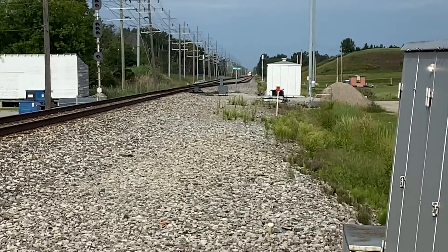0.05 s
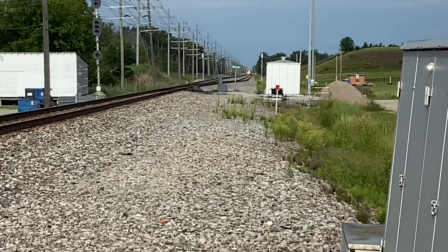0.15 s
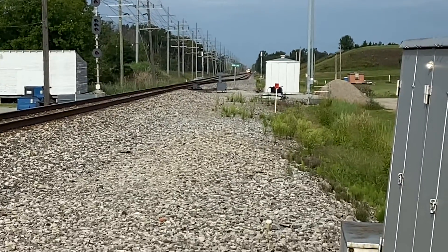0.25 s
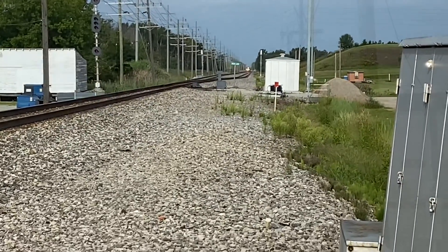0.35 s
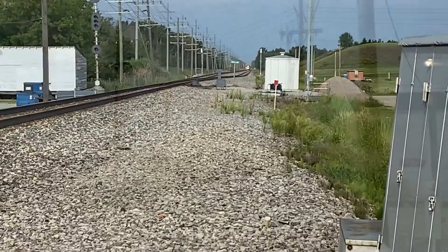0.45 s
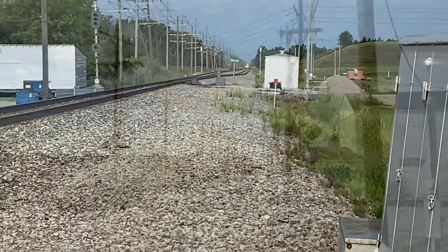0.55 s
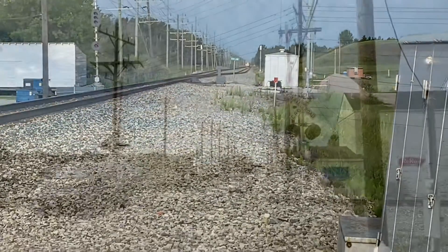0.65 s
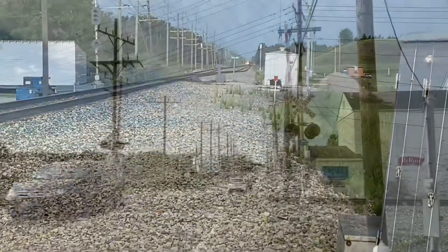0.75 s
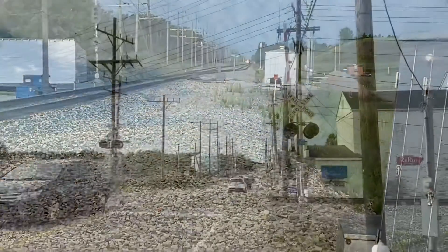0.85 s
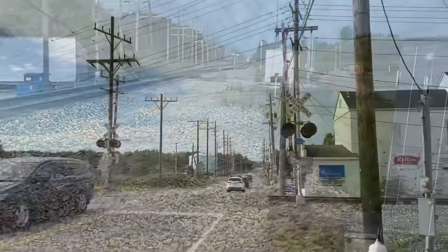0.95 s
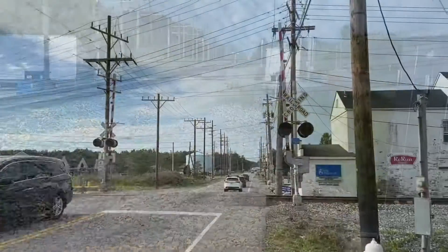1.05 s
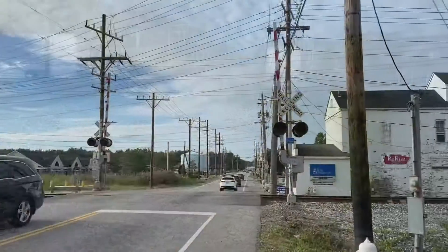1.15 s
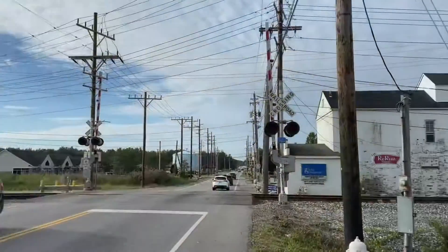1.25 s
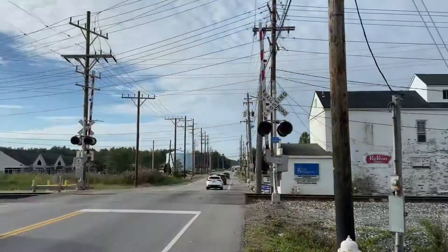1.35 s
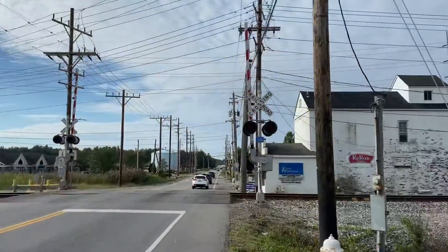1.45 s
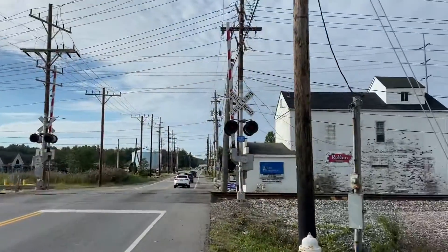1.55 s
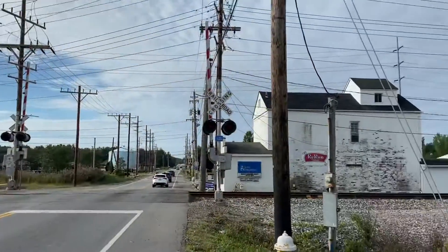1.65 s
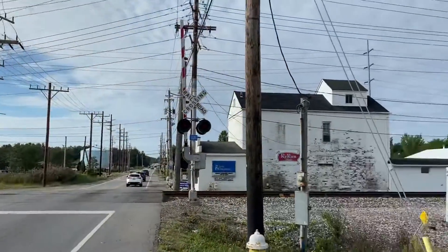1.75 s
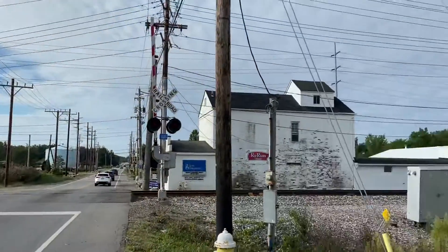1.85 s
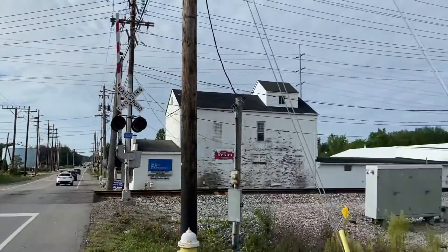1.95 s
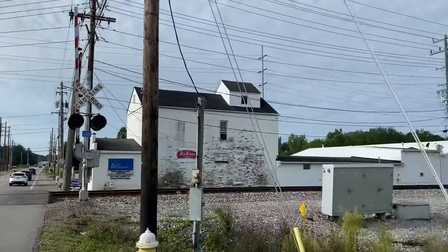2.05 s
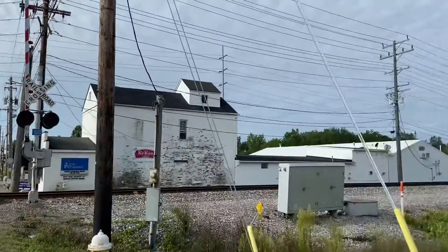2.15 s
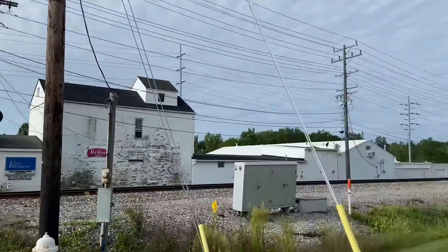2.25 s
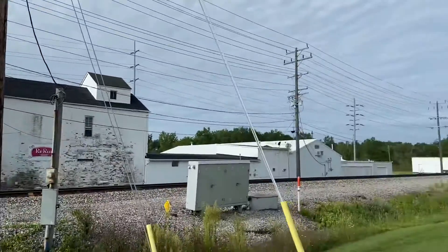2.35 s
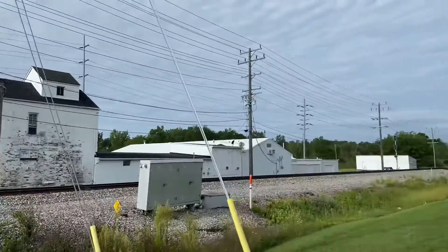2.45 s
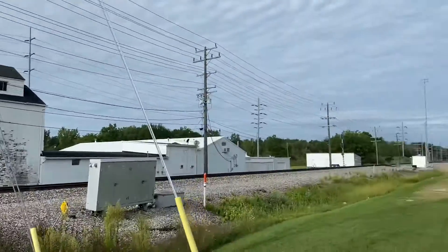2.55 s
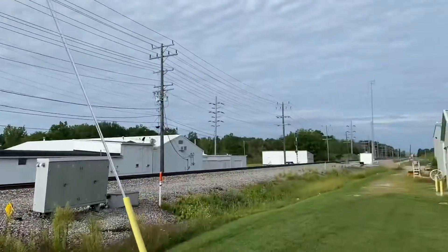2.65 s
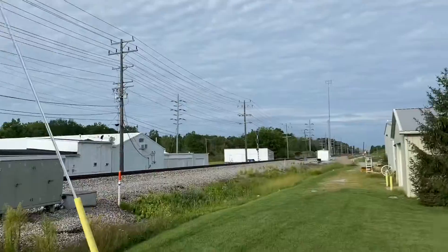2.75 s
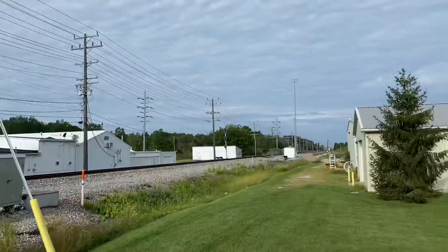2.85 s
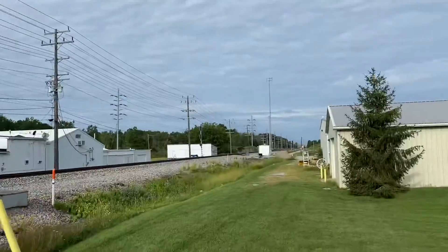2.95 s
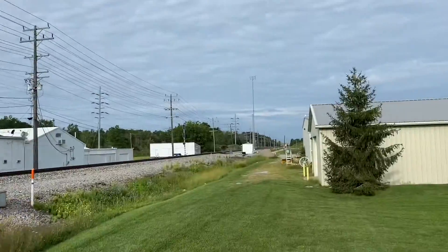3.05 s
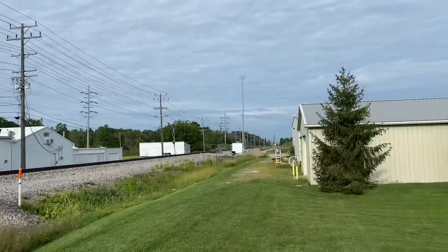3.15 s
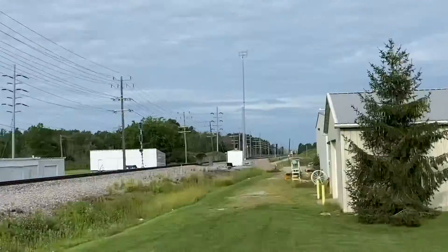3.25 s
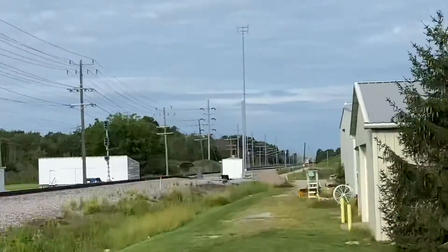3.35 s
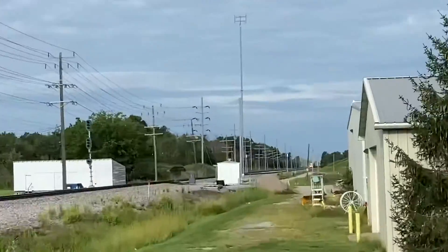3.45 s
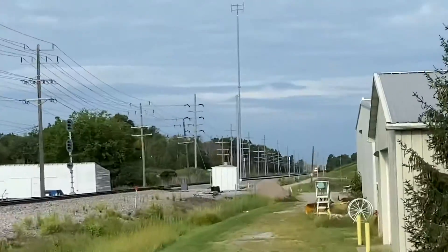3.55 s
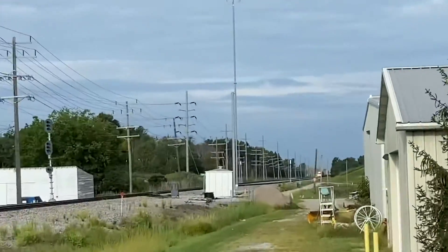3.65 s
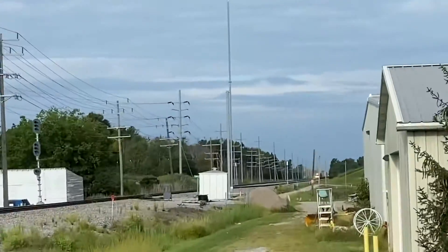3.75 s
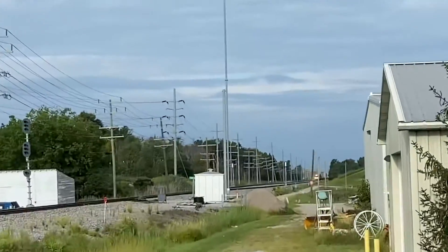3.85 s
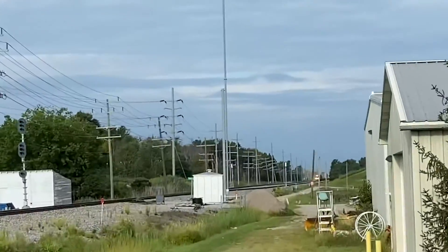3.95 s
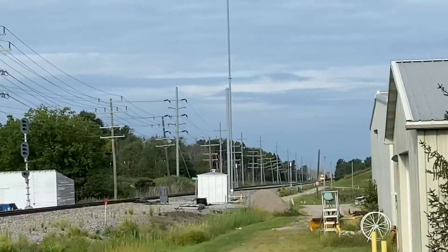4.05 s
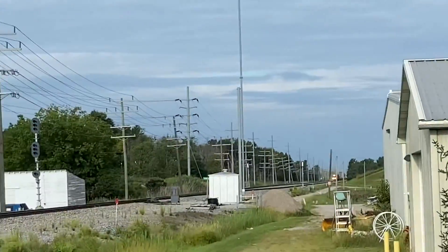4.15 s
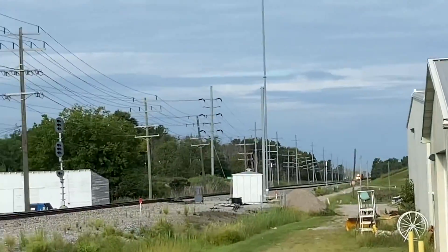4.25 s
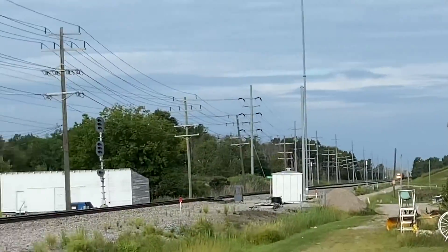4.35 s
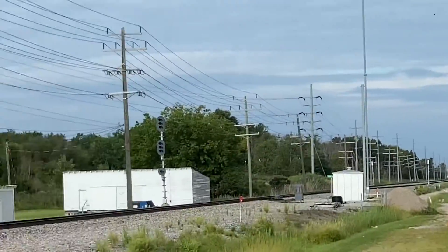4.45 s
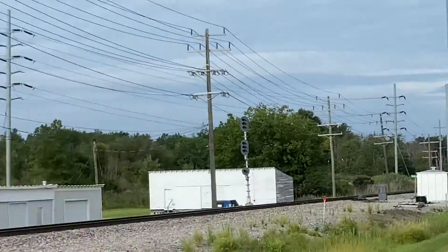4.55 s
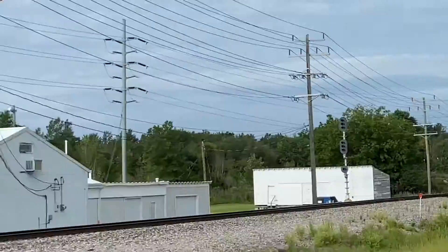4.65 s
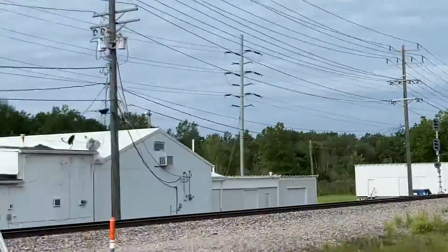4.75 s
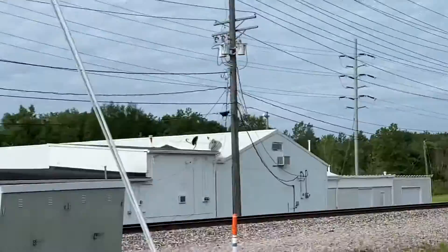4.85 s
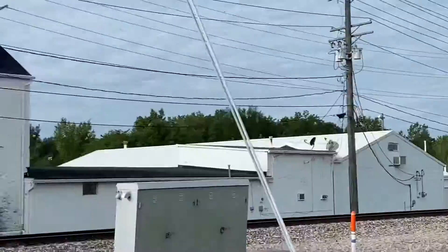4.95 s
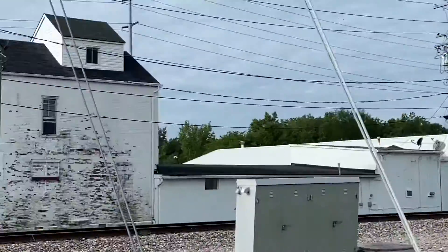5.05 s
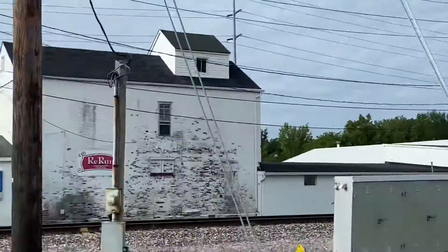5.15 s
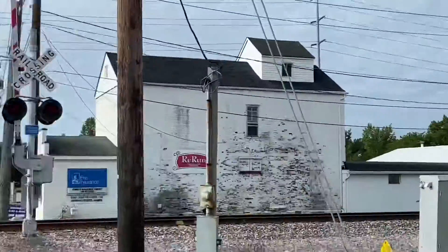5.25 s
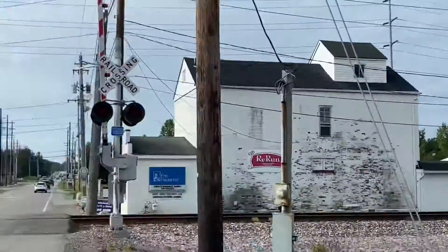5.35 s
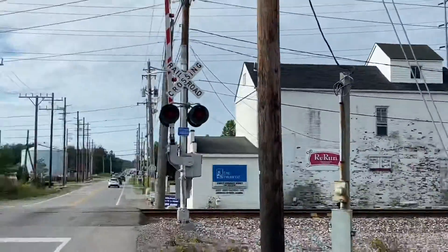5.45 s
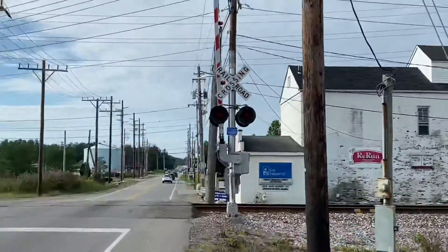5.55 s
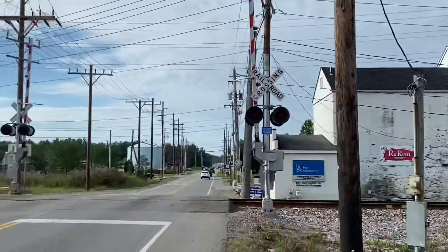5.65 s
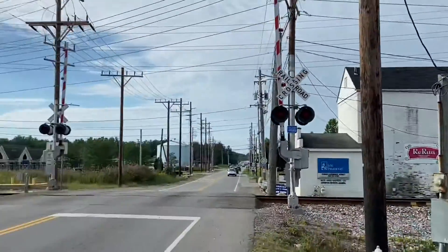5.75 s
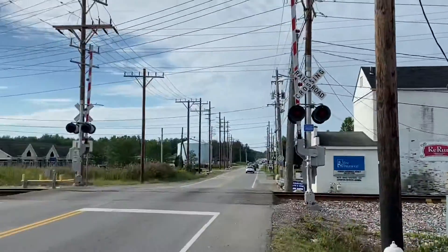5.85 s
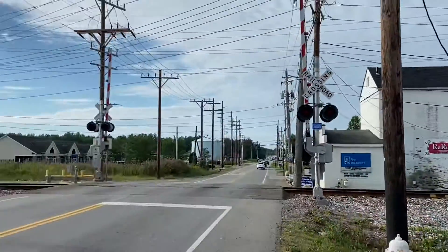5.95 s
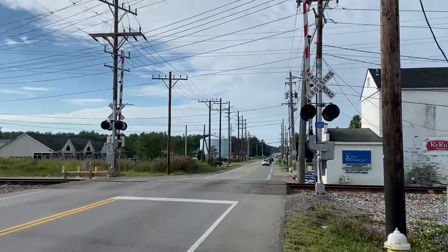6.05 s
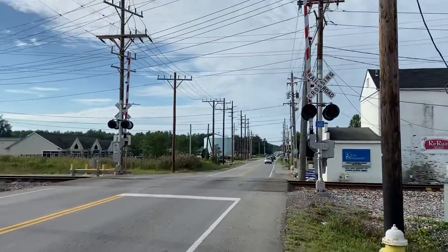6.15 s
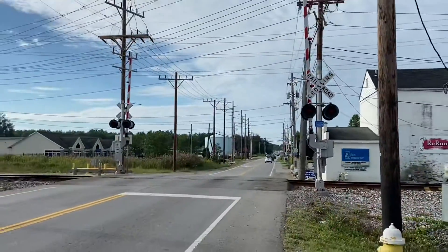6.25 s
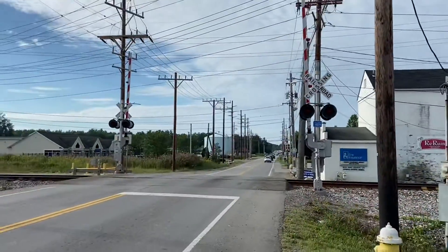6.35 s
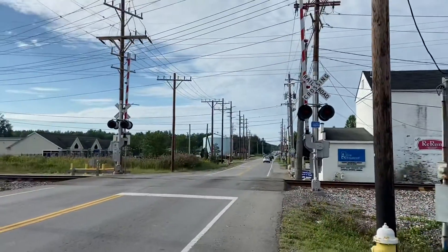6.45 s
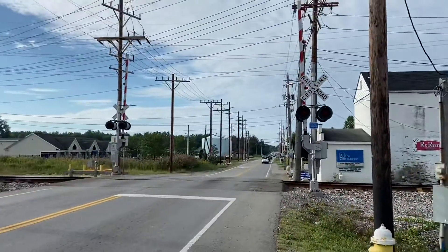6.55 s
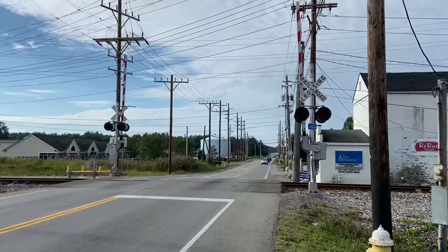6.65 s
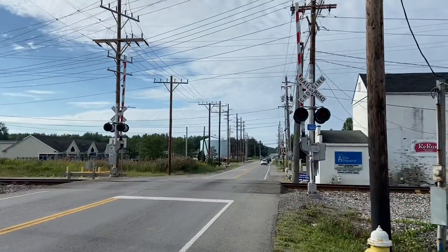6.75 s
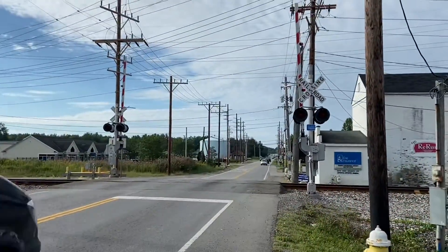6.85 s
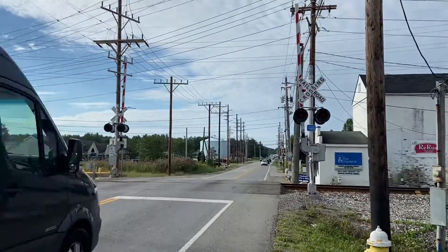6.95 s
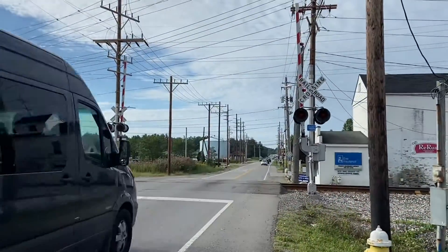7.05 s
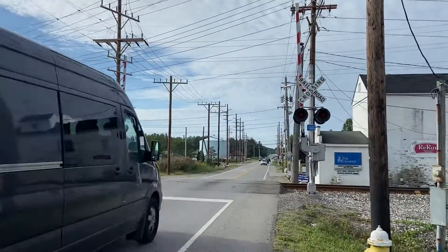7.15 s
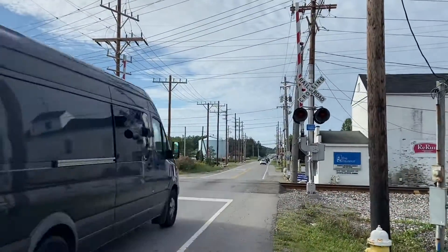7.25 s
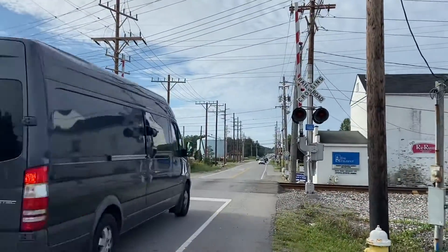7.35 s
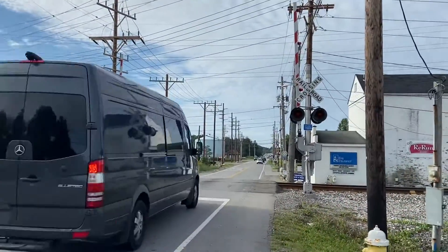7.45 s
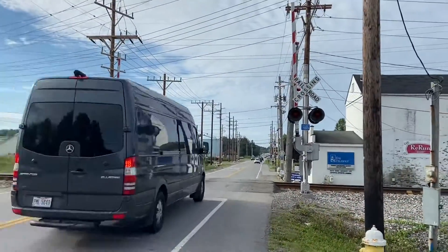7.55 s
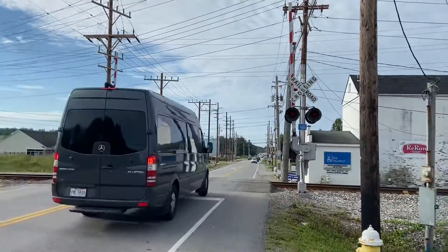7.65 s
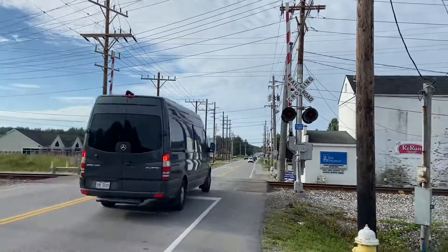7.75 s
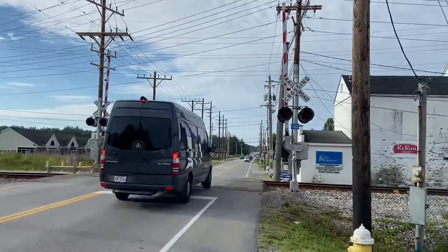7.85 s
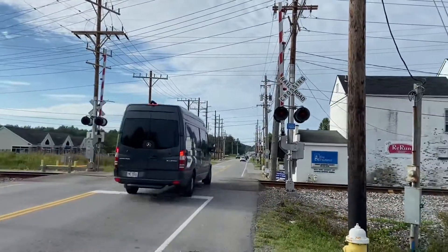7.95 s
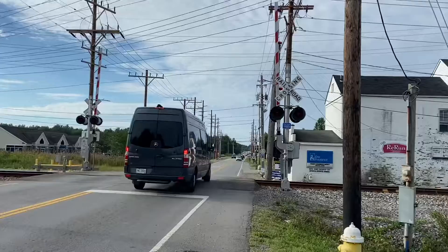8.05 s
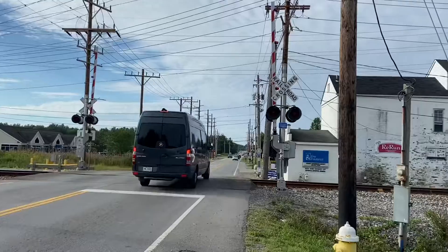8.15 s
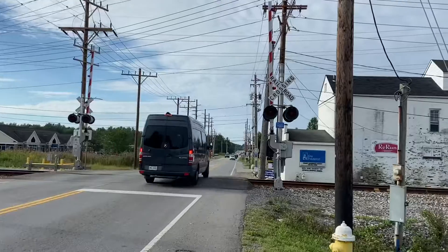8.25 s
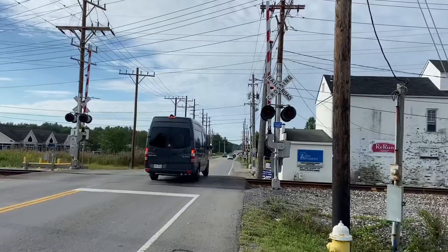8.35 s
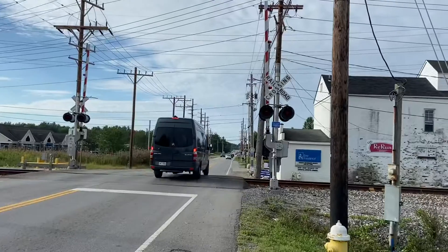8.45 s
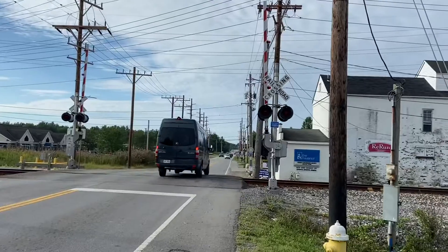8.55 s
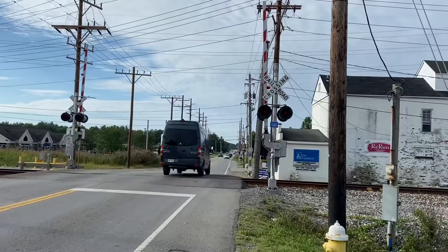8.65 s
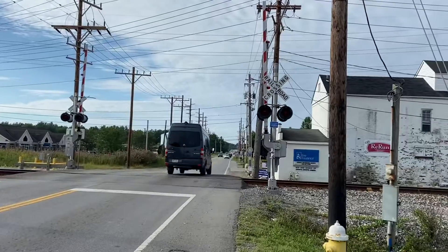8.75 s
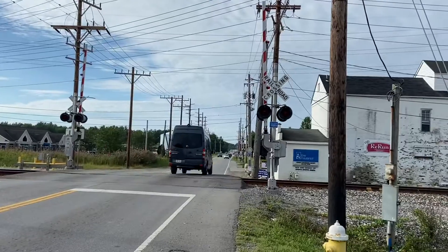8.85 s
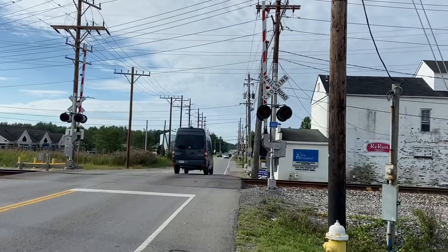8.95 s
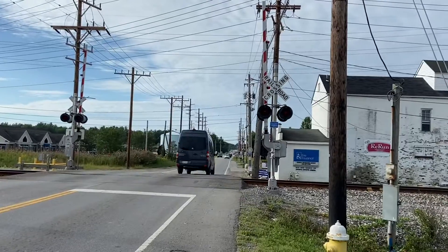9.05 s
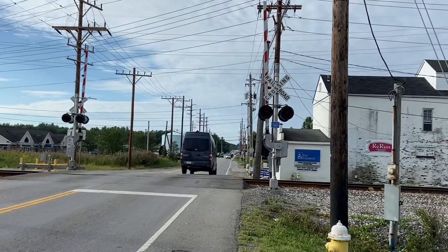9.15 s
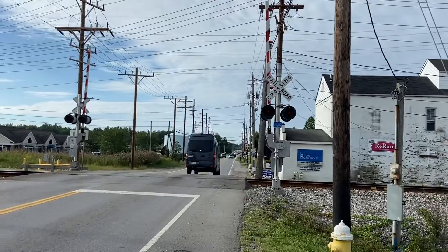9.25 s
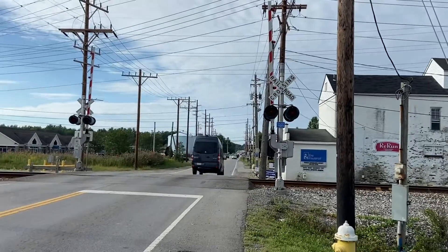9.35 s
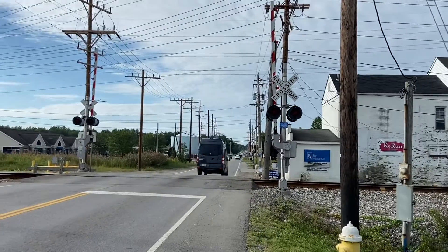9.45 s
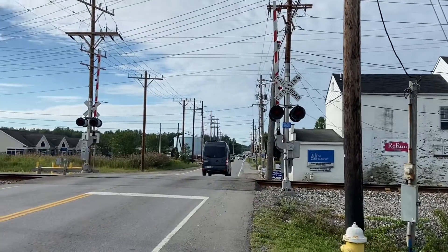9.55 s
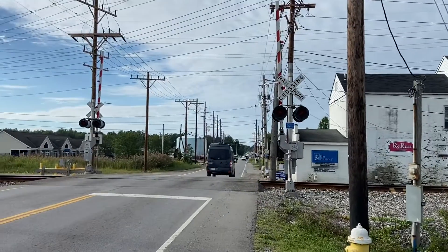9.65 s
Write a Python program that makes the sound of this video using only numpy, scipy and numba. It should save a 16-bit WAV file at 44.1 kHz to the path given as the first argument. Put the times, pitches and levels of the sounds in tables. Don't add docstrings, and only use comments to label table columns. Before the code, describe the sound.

Tyre noise swells and fades as vehicles pass close by, then a van jolts over two rail pairs with hard slaps, thuds and a short squeak.

```python
import sys
import numpy as np
from scipy import signal
from scipy.fft import rfft, irfft, next_fast_len
from scipy.io import wavfile
from scipy.ndimage import uniform_filter1d
from numba import njit

SR = 44100
rng = np.random.default_rng(int(sys.argv[2]) if len(sys.argv) > 2 else 0)


def makeup_ratio(level_db):
    decades = np.asarray(level_db, float) / 20
    return 10 ** decades


def persist_wave(psi):
    counts = np.round(np.clip(psi, -1, 1) * 32767).astype(np.int16)
    wavfile.write(sys.argv[1], SR, np.atleast_2d(counts).T)


N = 428211
FALL_SHARE = 0.062


def unit(x):
    return x / np.sqrt(np.mean(x ** 2))


def curves(table):
    times, *columns = np.transpose(table)
    return [np.interp(np.arange(N) / SR, times, column) for column in columns]


def at(table, hz):
    return np.interp(np.log(hz), np.log(np.array(table)[:, 0]), np.array(table)[:, 1])


@njit
def resonate(x, hz, width):
    y, b, l = np.empty(len(x)), 0., 0.
    g, k = np.tan(np.pi * hz / SR), width / hz
    for i in range(len(x)):
        v = (b + g * (x[i] - l)) / (1 + g * (g + k))
        b, l, y[i] = 2 * v - b, l + 2 * g * v, k * v
    return y


def band(hz, width):
    once = resonate(rng.standard_normal(N), 1. * hz, 1. * width)
    return unit(resonate(once, 1. * hz, 1. * width))


def walk(rate):
    k = int(SR / rate)
    steps = np.repeat(rng.standard_normal(N // k + 1), k)
    return 1.315 * uniform_filter1d(uniform_filter1d(steps, k), k)[:N]


def pan(db):
    return makeup_ratio(np.array([db / 2, -db / 2]))


def swell(s, db, rise, hold, fade):
    corners = np.cumsum([s - rise, rise, max(hold, 0), fade])
    levels = db - np.array([30, 0, 0, 30])
    return makeup_ratio(np.interp(np.arange(N) / SR, corners, levels, left=-120, right=-120))


def knocks(rows, rise, *shared):
    out = np.zeros(N + SR)
    for row in rows:
        s, db, hz, ring, fall = (*row, *shared)
        t = np.arange(int(SR * ring * 2)) / SR
        shape = (1 - np.exp(-t / (rise * ring))) * np.exp(-t * np.log(1000) / ring)
        sag = ring / (2 * max(fall, .01))
        wave = shape * np.sin(2 * np.pi * hz * sag * (1 - np.exp(-t / sag)))
        start = int(s * SR)
        out[start:start + len(t)] += makeup_ratio(db) * wave / shape.max()
    return out[:N]


# (frequency [Hz], level per Hz [dB])
FAR_COLOUR = [(110, -0.5), (250, -9), (400, -1.5), (630, -17), (850, 2), (1000, -12.5), (1400, 1),
              (2300, -16.5), (3800, -22.5), (5500, -27.5), (7200, -21), (9000, -71), (16000, -56)]
# (frequency [Hz], likeness [-1..1])
FAR_LIKENESS = [(120, 1), (300, 0.57), (600, -0.68), (1200, -0.022), (1900, 0.88), (2600, 1), (7000, 0.37),
                (11000, .6)]
# (frequency [Hz], left minus right [dB])
FAR_PAN = [(60, 0.0), (110, -5), (200, 3), (380, -3), (700, -1), (1290, -18), (2380, -4.5), (4400, 13.5),
           (8120, -3.5), (15000, 0.0)]
FAR_DB = -38.5


def far_road():
    out, slow = 0, walk(0.57)
    for hz in 130 * 2 ** (np.arange(21) / 3):
        alike = np.clip(at(FAR_LIKENESS, hz), -1, 1)
        mid = np.sqrt(1 + alike) * band(hz, hz / 3)
        side = np.sqrt(1 - alike) * band(hz, hz / 3)
        db = at(FAR_COLOUR, hz) + 10 * np.log10(hz) + .8 * slow + .9 * walk(6)
        out = out + makeup_ratio(db) * np.array([mid + side, mid - side]) * pan(at(FAR_PAN, hz))[:, None]
    return unit(out) * makeup_ratio(FAR_DB - 0.5)


# (tone [Hz], width [Hz], pulse rate [per second], sounding share [0-1])
INSECTS = [
    (7150, 90, 16, 0.45),
    (4800, 300, 53, 0.25),
]
# (time [s], first insect's level [dB], second insect's level [dB])
SONG = [
    (0, -80, -80),
    (1.8, -73, -80),
    (2.3, -73, -79),
    (3, -80, -78),
    (4.7, -76, -74),
    (5.2, -65, -62.5),
    (5.8, -68, -62.5),
    (6.3, -74, -64),
    (9, -72, -70),
    (9.71, -73, -71),
]


def insects():
    out = 0
    for (hz, width, rate, duty), db in zip(INSECTS, curves(SONG)):
        phase = np.cumsum(rate * (1 + .005 * walk(2))) / SR % 1
        tone = np.sin(2 * np.pi * hz * np.arange(N) / SR) + .4 * band(hz, width)
        strokes = np.sin(np.pi * np.clip(phase / duty, 0, 1)) ** 2
        out = out + makeup_ratio(db) * unit(strokes * tone)
    return out


# (time [s], level [dB], swell [s], hold [s], shut [s])
VENT = (2.66, -49.5, .6, .623, .008)


def vent():
    gain = swell(*VENT) * makeup_ratio(.8 * walk(25))
    return gain * np.array([band(4700, 3000), makeup_ratio(-6.0) * band(5200, 3000)])


# (time [s], peak level [dB], pitch [Hz], ring [s])
PUFFS = [
    (.034, -18, 62, 0.058),
    (.071, -20, 61.9, 0.097),
    (.166, -19.5, 60.4, 0.2),
    (.209, -20, 51.1, .067),
    (.311, -17.5, 81.5, 0.053),
    (.329, -14.5, 91.5, 0.042),
    (.359, -17.5, 67, .13),
    (.529, -30, 69.6, .062),
]


def wind_puffs():
    return knocks(PUFFS, 0.16, FALL_SHARE)


# (time [s], peak level [dB], pitch [Hz], left minus right [dB])
TICKS = [(2.0673, -40, 3270, 6), (2.242, -34, 2740, 0), (2.551, -52, 2680, 4), (2.6348, -49, 2846, 0.0),
         (2.6705, -36, 4100, -1), (2.7544, -45, 4154, -1.5), (2.8784, -49, 2620, 3), (6.8099, -31, 3120, 4),
         (8.2383, -31, 3142, 5), (8.6104, -35, 2510, -14), (8.734, -28, 3900, 13)]
TICK_RING_S = 0.0048


def ticks():
    out = np.zeros((2, N))
    length = 1024
    dying = np.exp(-np.arange(length) / SR * np.log(1000) / TICK_RING_S)
    for s, db, hz, pan_db in TICKS:
        click = resonate(rng.standard_normal(length) * dying, 1. * hz, 3.3 * hz)
        start = int((s + .001) * SR)
        out[:, start:start + length] += makeup_ratio(db) * click / abs(click).max() * pan(pan_db)[:, None]
    return out


# (nearest time [s], tread roar level [dB], coming [s], going [s], kind)
PASSES = [(.2, -48, 1., 0.51, "yard"), (1.2, -32, 0.28, 0.44, "nose"), (1.7, -28, 0.42, 0.3, "car"),
          (2.75, -36.5, 0.32, 0.17, "far"), (3.4, -42, 0.39, 0.52, "side"), (4.5, -43, 0.66, 0.56, "side"),
          (5.25, -39.5, 0.3, 0.33, "far"), (5.9, -35.5, 0.44, 0.51, "road"),
          (6.65, -29.5, 0.29, 0.19, "van"), (6.92, -26, 0.18, 0.26, "nose"),
          (7.35, -31.5, 0.26, 0.42, "van"), (8.1, -36, 0.58, 0.8, "tail"),
          (9.55, -36.5, 0.39, 0.68, "next")]
KINDS = {"yard": (3.5, 8, -6, 10.5), "nose": (-6.5, -9, -18, -13), "car": (-7.5, -13, -22.5, -15),
         "far": (-9, -11.5, -51, -5), "side": (-5.5, -1.5, -29.5, -2.5), "van": (-7.5, -5, -15, -10),
         "road": (-10, -7.5, -31, -9), "tail": (-3, -8.5, -16.5, -6), "next": (-5, -6, -23.5, -3)}
FADE = [1.1, 1.33, 1.56, 1.73, 0.7]
# (time [s], level [dB])
BOOMS = [
    (8.35, -30),
    (8.63, -29),
]
BOOM_S = 0.36
SCREENING = 2.91


def traffic():
    t, power = np.arange(N) / SR, 0
    for s, db, coming, going, kind in PASSES:
        away = abs((t - s) / np.where(t < s, coming, going))
        away_db = 10 * np.log10(1 + away ** SCREENING)
        drone, sizzle, hiss, rumble = KINDS[kind]
        nearest_db = db + np.array([[drone], [0], [sizzle], [hiss], [rumble]])
        power = power + makeup_ratio(nearest_db - np.outer(FADE, away_db)) ** 2
    power[0] = power[0] + sum(swell(s, db, BOOM_S, 0, BOOM_S) ** 2 for s, db in BOOMS)
    return 10 * np.log10(power)


# (frequency [Hz], level per Hz [dB])
RUMBLE = [(12, -44), (20, -49), (37, -9), (65, -1), (92, -7), (118, -8), (170, -8), (220, -41), (370, -120)]
# (time [s], firing rate [Hz], firing tone level [dB])
ENGINE = [(0.0, 92.4, -37.5), (0.86, 110, -47.5), (1.16, 105.5, -42.5), (1.38, 89.4, -41),
          (1.73, 87.5, -33), (1.83, 86.7, -52), (1.97, 87, -38), (2.24, 84.2, -44), (4.0, 86.1, -47),
          (5.03, 78.9, -47), (5.52, 75, -54), (5.97, 78.8, -44), (6.38, 78, -49), (6.71, 81.4, -43.5),
          (7.19, 74.5, -38.5), (7.45, 77, -50), (8.8, 92, -41.5), (9.71, 95.1, -38)]
# (time [s], level [dB], pitch [Hz], swell [s], hold [s])
LABOURS = [
    (5.8, -33, 51, .23, .01),
    (7.2, -36, 44, 1.1, .01),
    (9.3, -43, 48.5, .9, .5),
]
LABOUR_FADE_S = .35


def engines():
    rumble_db, (hz, tone_db) = traffic()[-1], curves(ENGINE)
    rumble = 0
    for f in 38 * 2 ** (np.arange(6) / 2.89):
        rumble = rumble + makeup_ratio(at(RUMBLE, f) + 10 * np.log10(f)) * band(f, f / 3)
    phase = 2 * np.pi * np.cumsum(hz * (1 + 0.01035 * walk(12))) / SR
    tone = makeup_ratio(tone_db + 2.0 * walk(14)) * (1.35 * np.sin(phase) + 0.41 * np.sin(2 * phase))
    labour = 0
    for s, db, f, rise, hold in LABOURS:
        beat = 1.44 * np.sin(2 * np.pi * f * np.arange(N) / SR)
        labour = labour + swell(s, db, rise, hold, LABOUR_FADE_S) * beat
    side = makeup_ratio(rumble_db - 12.5) * band(75, 110)
    return makeup_ratio(rumble_db) * unit(rumble) + tone + labour + np.array([side, -side])


# (time [s], level [dB], hold [s], first pitch [Hz], last pitch [Hz])
RIDGES = [(1.5, -46, .3, 2900, 2500), (1, -51, .3, 4100, 3400), (1.05, -41, .35, 1400, 1250),
          (1.7, -54, .2, 4100, 4200), (6.6, -38.5, .15, 2400, 2500), (6.6, -43, .3, 3500, 3100),
          (6.3, -51, 0.095, 3400, 3300), (6.62, -34, .2, 720, 620), (6.05, -44.5, .3, 1500, 1450),
          (.9, -57, .25, 4900, 4700), (7.5, -61, .5, 6000, 5800), (6.88, -32, 0.12, 640, 600),
          (7.4, -51.5, .5, 4800, 4400), (1.3, -38, 0.301, 450, 400), (7.1, -36.5, .4, 700, 950),
          (7.7, -50.5, .35, 3600, 2900), (6.5, -56, .06, 6300, 7000), (3.53, -56, 1.27, 2700, 2700)]
RIDGE_RISE_S, RIDGE_FADE_S = 0.21, 0.91


def sliding_bands():
    out = 0
    for s, db, hold, first_hz, last_hz in RIDGES:
        hz = curves([(s, first_hz), (s + hold, last_hz)])[0]
        phase = 2 * np.pi * np.cumsum(hz) / SR
        blur = int(20 + 3e4 / first_hz)
        noise = rng.standard_normal((2, N))
        a, b = uniform_filter1d(uniform_filter1d(noise, size=blur), size=blur)
        ridge = unit(a * np.cos(phase) + b * np.sin(phase))
        out = out + swell(s, db, RIDGE_RISE_S, hold, RIDGE_FADE_S) * ridge
    return np.array([makeup_ratio(0.5) * out, np.roll(out, shift=2)])


# (time [s], peak level [dB], pitch
# [Hz], ring [s], fall [share])
SNAPS = [(2.068, -27, 14000, .004, 2.5), (2.243, -33, 5500, .005, 1.5), (2.2433, -25, 2600, .007, 2.2),
         (2.2436, -21, 1100, .01, 1.2), (2.2442, -21, 520, .016, 1), (2.6355, -29, 3200, .007, 2),
         (2.6712, -24, 7800, .006, 2), (2.672, -22, 3900, .004, 1.5), (1.3155, -16, 820, .025, .15),
         (2.753, -18, 800, .02, .3), (2.754, -34, 6500, .005, 2), (6.7295, -17, 800, .015, .1),
         (6.7343, -10, 1150, .011, .3), (6.7485, -18, 330, .025, .5), (6.8112, -10, 1500, .018, 2.6),
         (6.8132, -12, 620, .02, 1.3), (7.636, -18, 870, .012, .3), (8.2412, -11, 1100, .014, .8),
         (8.3715, -23, 1480, .05, .1), (8.382, -25, 1330, .05, .05), (8.398, -25, 1400, .02, .1),
         (8.5862, -12, 1550, .016, .7), (8.385, -30, 3000, .03, .1), (8.593, -22, 1400, .015, .2),
         (8.7345, -24, 3100, .012, .3), (8.7385, -22, 2100, .014, .3), (8.7372, -18, 1100, .006, .6),
         (8.746, -26, 2300, .012, .2)]


def sharp_snaps():
    return knocks(SNAPS, rise=0.0019)


# (time [s], peak level [dB], pitch [Hz], ring [s])
SLAPS = [(1.351, -19, 894, 0.039), (2.75, -30, 757, 0.093), (2.799, -32.5, 513, .025),
         (4.481, -24.5, 495, 0.029), (5.345, -25, 861, .021), (8.223, -21, 406, 0.045),
         (8.242, -13, 425, 0.021), (8.262, -22.5, 961, 0.056), (8.352, -19, 482, 0.055),
         (8.354, -23, 660, .03), (8.374, -17, 378, 0.028), (8.391, -28, 542, 0.013),
         (8.404, -19.5, 415, 0.0296), (8.587, -23, 1150, 0.02), (8.591, -23, 389, 0.015),
         (8.601, -9, 427, 0.0092), (8.604, -10, 482, 0.05), (8.611, -20, 850, .02),
         (8.626, -19, 474, 0.041), (8.641, -19, 765, 0.02), (8.719, -6.5, 485, 0.039),
         (8.726, -19, 850, .03), (8.736, -5.5, 423, 0.013), (8.747, -14, 330, 0.028),
         (8.759, -18.5, 848, 0.037), (8.765, -16.5, 391, 0.085)]
# (time [s], peak level [dB], pitch [Hz])
THUDS = [(7.109, -20, 81.1), (8.245, -16.5, 91.4), (8.256, -23, 205), (8.267, -21, 260), (8.278, -21, 123),
         (8.292, -28, 160), (8.364, -23, 238), (8.385, -20.5, 127.8), (8.393, -19.5, 242), (8.41, -25, 230),
         (8.425, -25, 149.6), (8.445, -20, 83.8), (8.608, -13, 193), (8.625, -19, 113), (8.659, -22, 95),
         (8.69, -25, 110), (8.736, -15, 258), (8.766, -16, 96.9), (8.78, -22, 268)]
THUD_RING_S = 0.067
# (time [s], level [dB], hold [s])
RATTLES = [
    (2.72, -28, .01),
    (2.754, -21.5, 0.057),
    (2.84, -32, .04),
    (7.14, -30, 0.056),
    (8.239, -17.5, .006),
    (8.355, -22, 0.04),
    (8.59, -17.5, 0.016),
    (8.716, -19, 0.044),
]
RATTLE_RISE_S, RATTLE_FADE_S = 0.02, 0.068
# (time [s], level [dB], hold [s])
CLINKS = [
    (2.665, -48, .012),
    (2.752, -43, 0.059),
    (2.84, -52, .04),
    (7.16, -37, 0.022),
    (7.234, -36, 0.02),
    (8.24, -42, .002),
    (8.372, -34.5, .003),
    (8.44, -47, .02),
    (8.749, -35.5, .002),
    (8.8, -49, .06),
]
CLINK_RISE_S, CLINK_FADE_S = 0.051, 0.049
# (time [s], pitch [Hz], level [dB])
SQUEAK = [
    (8.733, 2600, -45),
    (8.737, 2900, -31),
    (8.742, 3750, -30),
    (8.755, 3900, -32),
    (8.76, 3900, -43),
    (8.79, 3850, -46),
    (8.805, 3900, -59),
    (8.83, 4300, -56),
    (8.845, 4400, -45),
    (8.87, 4500, -60),
]


def crossing():
    body = makeup_ratio(2.8 * walk(180)) * band(650, 1100)
    late_grit = 1.4 * (np.arange(N) > 8 * SR) * band(11200, 6300)
    metal = makeup_ratio(2.8 * walk(250)) * (band(4200, 1900) + late_grit)
    rattle = body * sum(swell(s, db - 11.0, RATTLE_RISE_S, hold, RATTLE_FADE_S) for s, db, hold in RATTLES)
    clink = metal * sum(swell(s, db - 3.0, CLINK_RISE_S, hold, CLINK_FADE_S) for s, db, hold in CLINKS)
    hz, db = curves(SQUEAK)
    sounding = (db > db[-1]) * (db != db[0])
    phase = 2 * np.pi * np.cumsum(hz * (1 + 0.04 * walk(1500))) / SR
    squeak = makeup_ratio(db + 2.5 * walk(160)) * sounding * np.sin(phase)
    slaps = knocks(SLAPS, 0.023, FALL_SHARE)
    thuds = knocks(THUDS, 0.062, THUD_RING_S, FALL_SHARE)
    return slaps + thuds + rattle + clink + squeak


TYRE_BANDS_HZ = [280, 800, 2100, 5200]
# (frequency [Hz], level per Hz [dB])
TYRE_COLOUR = [(110, -6.5), (180, -2), (250, 1), (330, -5), (470, -4.5), (600, -8), (850, 0), (1120, -6),
               (2100, -9), (4600, -23.5), (7800, -33), (10300, -31), (13000, -33.5), (16000, -35)]
# (frequency [Hz], width [Hz], level over the roar [dB])
TYRE_MODES = [(246.6, 36, -9), (488, 89, -7), (857, 150, -12.5), (1398, 270, -2.5), (1890, 460, -2.5)]
# (time [s], left minus right [dB], scattered share [0-1])
BEARING = [(0, -1, 0.77), (.75, 0, 0.42), (1.25, 2.5, 0.08), (1.75, 3, 0.12), (2.25, 3.5, 0.34),
           (2.8, -1.5, 0.27), (4.5, -0.5, 0.58), (5.2, 2.5, 0.05), (5.8, -1, 0.44), (6.2, -6, 0.42),
           (6.7, 3, 0.25), (7.2, 4.5, 0.15), (7.7, 0.5, 0), (8.8, 3.5, 0.02), (9.2, 1.5, 0.5),
           (9.71, -2, 0.5)]
# (time [s], left lead [ms], left lead above TREBLE_HZ [ms])
LEAD = [(0, -.33, 0), (.7, -.3, 0), (.9, .04, .08), (1.2, .22, .26), (1.4, .31, .32), (1.6, .39, .39),
        (1.8, .43, .43), (2.9, .37, .37), (3.15, -.34, -.3), (3.4, -.35, 0), (4.7, -.36, 0), (5., .14, .02),
        (5.7, 0, .01), (6., .42, .33), (6.7, .37, .33), (6.85, .28, .03), (7.1, .14, .02), (7.4, .05, .04),
        (8.8, .045, .04), (9.05, .15, .1), (9.4, .42, .02)]
# (frequency [Hz], share of the lead [1 = all])
LEAD_SHARE = [(200, 1.25), (500, 1.3), (800, 1.), (1100, .8), (1900, .72), (2500, .95), (3000, 1.),
              (6500, 1.), (7200, 0)]
TREBLE_HZ = 2300
SHELF_HZ = 8300


def tyres():
    levels, leads_ms, (pan_db, scatter) = traffic(), curves(LEAD), curves(BEARING)
    scatter, out, n = np.clip(scatter, 0, 1), 0, np.arange(N)
    bumps, tread = walk(9), walk(70)
    corners = np.arange(4)
    slices = [(hz, hz / 3, 0) for hz in 130 * 2 ** (np.arange(22) / 3)]
    for hz, width, mode_db in [*slices, *TYRE_MODES]:
        place = np.interp(np.log(hz), np.log(TYRE_BANDS_HZ), corners)
        k = min(int(place), 2)
        drive_db = levels[k] + (place - k) * (levels[k + 1] - levels[k])
        own_db = at(TYRE_COLOUR, hz) - np.interp(place, corners, at(TYRE_COLOUR, TYRE_BANDS_HZ))
        share_db = 10 * np.log10(hz / 800) - np.interp(place, corners, [1.0, 2.5, 9.5, 16.5])
        direct, stray = band(hz, width), band(hz, width)
        half = leads_ms[int(hz > TREBLE_HZ)] * SR / 2000 * at(LEAD_SHARE, hz)
        pair = np.array([np.interp(n + half, n, direct), np.interp(n - half, n, direct)])
        loose = scatter * min(hz / 500, 1)
        pair = np.sqrt(1 - loose) * pair + np.sqrt(loose) * np.array([stray, stray[::-1]])
        rough_db = 0.28 * bumps + 1.01 * tread + 1.0 * walk(20) + 1.5 * (hz > SHELF_HZ) * walk(25)
        gain = makeup_ratio(drive_db + own_db + share_db + mode_db + rough_db)
        out = out + gain * pair * pan(pan_db * min(hz / 600, 1))
    return out


def scene():
    blows = crossing() + sharp_snaps() + insects()
    ahead = np.array([makeup_ratio(-1.0) * blows, np.roll(blows, shift=2)])
    background = far_road() + vent() + wind_puffs() + ticks()
    return background + engines() + sliding_bands() + ahead + tyres()


def low_pass(x):
    return signal.sosfilt(signal.butter(12, 16440, fs=SR, output="sos"), x)


# (from time [s], to time [s], limit [Hz])
NARROW = [
    (0, .75, 3500),
    (.75, 1.95, 6300),
    (3.3, 5.95, 3500),
    (5.95, 6.4, 6400),
    (6.9, 9.45, 6300),
]
PAIR_HZ, TURN_HZ, HOLE = 7000, 4100, .45
SHELF_DB, TOP_HZ = -5.5, 15600


def record(dry):
    size = next_fast_len(N)
    hz, t = np.arange(size // 2 + 1) * SR / size, np.arange(N) / SR
    mid, side = rfft(dry[0] + dry[1], size) / 2, rfft(dry[0] - dry[1], size) / 2
    low_cut = hz ** 2 / (hz ** 2 + 20.0 ** 2)
    mid = mid * np.where(hz > SHELF_HZ, makeup_ratio(SHELF_DB), 1) * (hz < TOP_HZ) * low_cut
    turn = -np.pi * np.maximum(hz - PAIR_HZ, 0) / TURN_HZ
    late_gain = makeup_ratio(2.5 - 2.6 * (hz < SHELF_HZ) - 5.5 * (hz > PAIR_HZ + TURN_HZ))
    late = 1j * late_gain * mid * np.sin(turn) + makeup_ratio(SHELF_DB - 12.0) * side
    late = late * (abs(np.sin(turn)) > HOLE)
    wide = irfft(np.where(hz > PAIR_HZ, late, side), size)[:N]
    for limit in {row[2] for row in NARROW}:
        shut = sum((t >= start) & (t < end) for start, end, lo in NARROW if lo == limit)
        above = irfft(side * (hz > limit) * (hz <= PAIR_HZ), size)[:N]
        wide = wide - uniform_filter1d(1. * shut, size=512) * above
    mid = irfft(mid * np.cos(turn) * (abs(np.cos(turn)) > HOLE), size)[:N]
    return low_pass(np.array([mid + wide, mid - wide]))


dry = scene()
out = record(dry)
persist_wave(out)
```